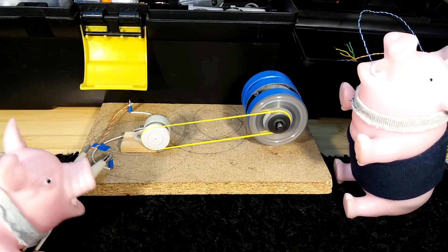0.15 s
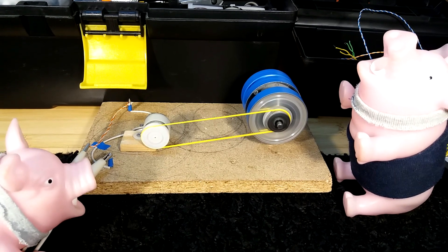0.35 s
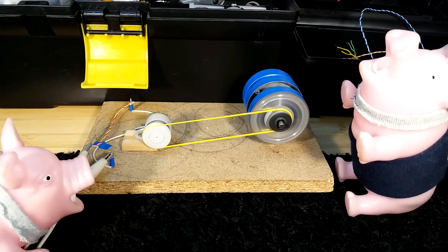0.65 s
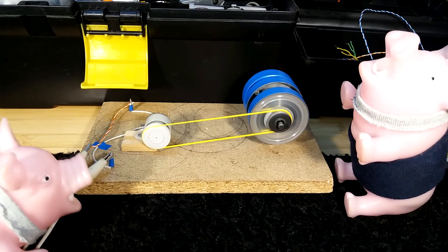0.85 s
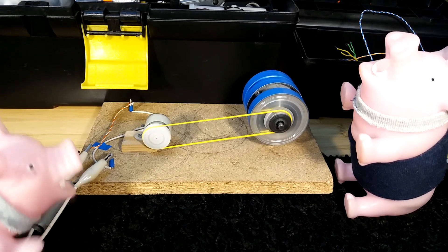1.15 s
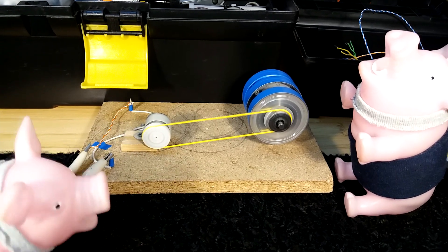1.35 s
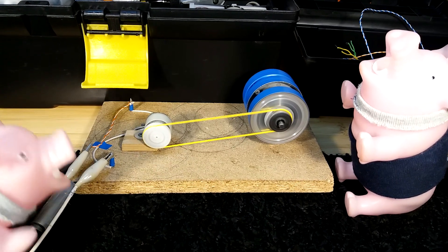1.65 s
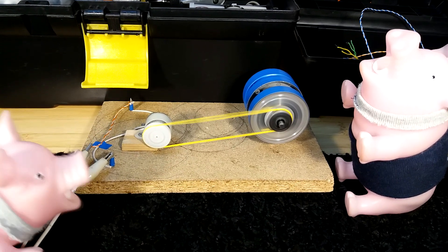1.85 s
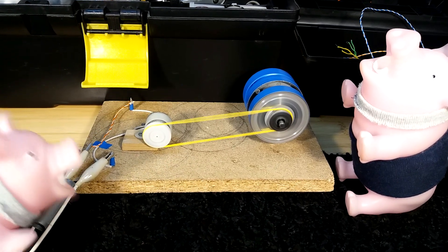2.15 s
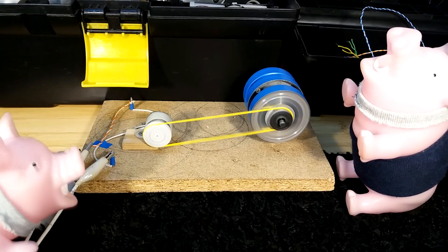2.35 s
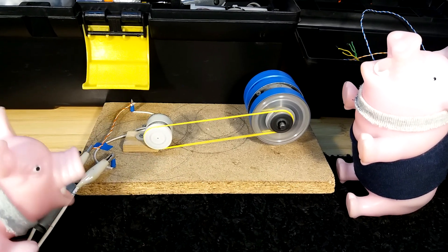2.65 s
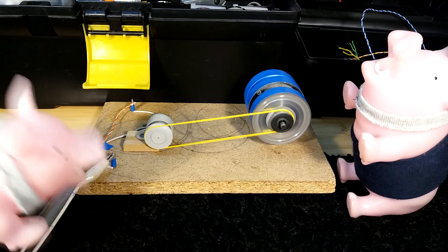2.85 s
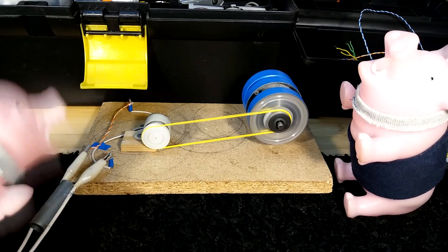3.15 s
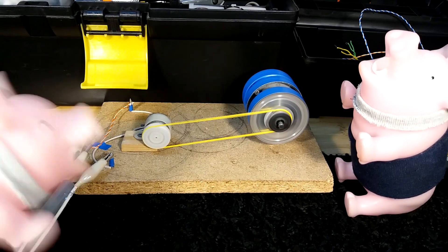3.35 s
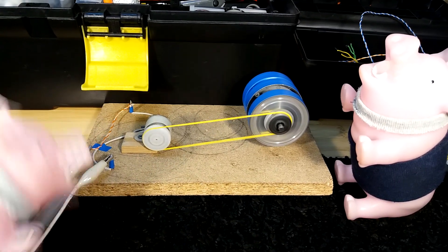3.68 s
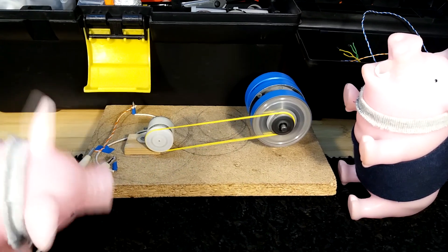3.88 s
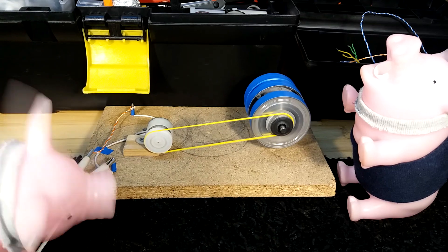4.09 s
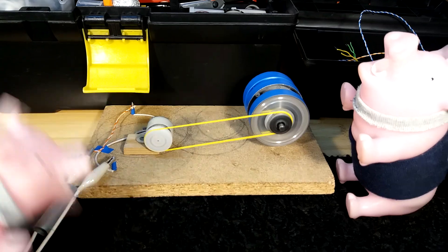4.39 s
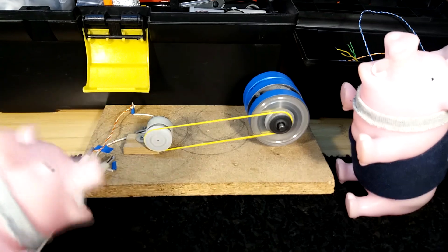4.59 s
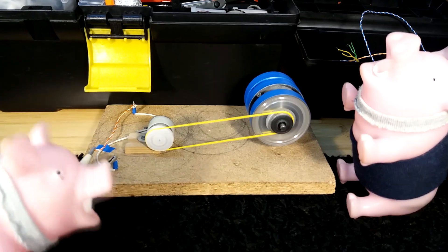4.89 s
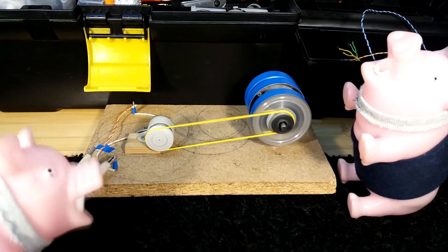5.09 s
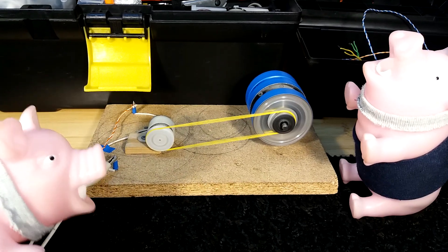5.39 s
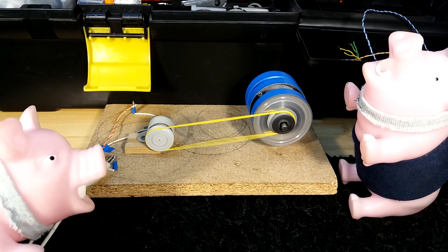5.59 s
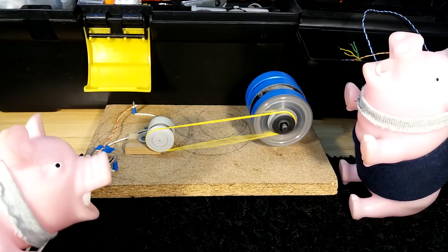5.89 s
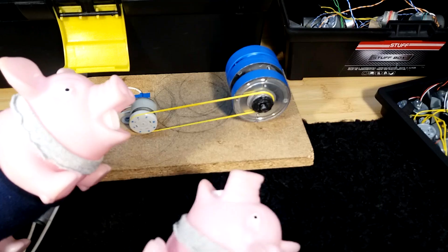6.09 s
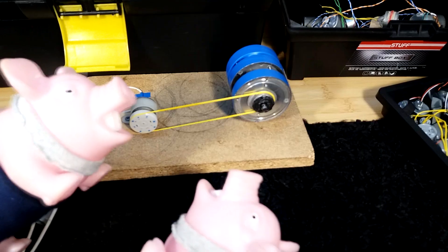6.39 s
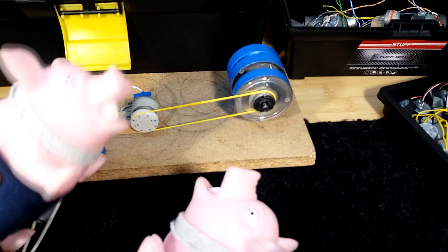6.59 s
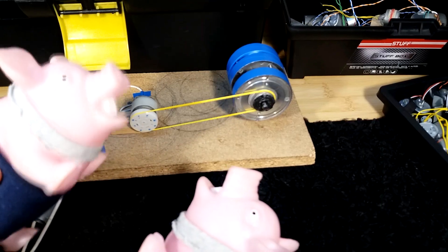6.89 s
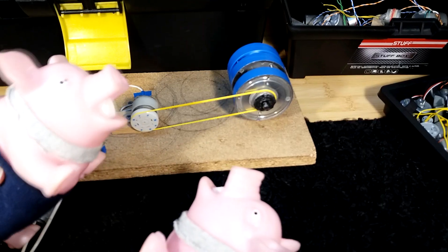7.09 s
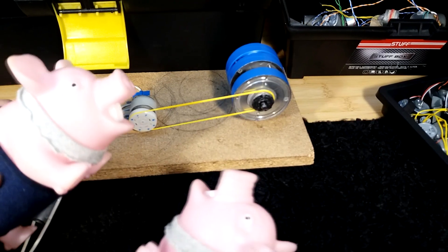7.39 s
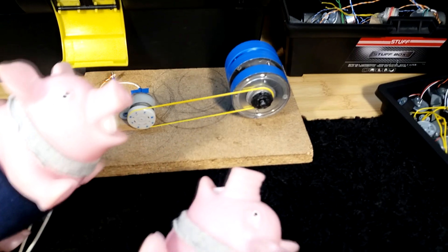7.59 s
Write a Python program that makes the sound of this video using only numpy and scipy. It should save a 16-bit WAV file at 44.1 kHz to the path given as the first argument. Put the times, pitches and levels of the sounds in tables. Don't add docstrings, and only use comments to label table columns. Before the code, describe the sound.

Buzzing, knocking little motor gradually dropping in pitch under short rubbery toy grunts, then abrupt quiet with loud squeals and faint air hisses.

```python
import sys
import numpy as np
from scipy import signal
from scipy.fft import rfft, irfft
from scipy.io import wavfile
from scipy.ndimage import uniform_filter1d

SR = 44100
rng = np.random.default_rng(int(sys.argv[2]) if len(sys.argv) > 2 else 0)


def generate_wav(signal):
    frames = np.transpose(np.atleast_2d(signal))
    scaled = np.clip(frames, -1, 1) * 32767
    pcm = np.round(scaled).astype(np.int16)
    wavfile.write(sys.argv[1], SR, pcm)


def how_loud(loudness_db):
    steps = np.asarray(loudness_db, float) / 20
    return 10 ** steps


N = 341334
MOTOR_END_S = 6.048

# start_s, length_s, strength_db, top_flap_rate_hz,
# grip_db (+ opens the throat, - the snout)
NEAR_GRUNTS = [
    (5.095, .118, -18.5, 237.8, 1),
    (6.222, 0.1, -22, 108.8, 1.4),
    (6.478, 0.15, -18, 240.2, 3),
    (6.817, 0.1, -18.5, 208.7, 2.5),
    (7.054, 0.11, -24, 102.4, 1.9),
    (7.289, .142, -17.5, 225, 1),
    (7.508, 0.13, -18.5, 177.3, 1.8),
    (7.659, .12, -17.5, 231.7, 1.4),
]


def motor(mode_spread_db=3.0, grit_per_s=2500, grit_db=3.5, wobble=0.082, late_s=.0004):
    # time_s, turns_per_s
    shaft_speed = [(0.0, 100.86), (0.6, 98.55), (1.2, 95.21), (1.8, 92.02), (2.4, 88.95), (3.0, 85.83),
                   (3.6, 82.81), (4.2, 80.03), (4.8, 77.12), (5.4, 74.39), (6.0, 71.71)]
    # time_s, knock_db, brush_grind_db
    shaft_load = [
        (0, -33.5, -26.5),
        (1.5, -32, -32),
        (3, -30.5, -33),
        (4.5, -30.5, -36.5),
        (6.05, -32.5, -38),
    ]
    # pitch_hz, width_hz, knock_db, brush_db
    can_modes = [(184, 46.6, -20.5, -25.5), (547, 26, -20, -21.5), (831, 27.4, -22, -38),
                 (1127, 35, -21.5, -8), (1534, 32, -21, -9.5), (1961, 84, -12.5, -11), (3010, 81, -25, -6),
                 (3224, 167, -26, -20), (4336, 75, -19, 2.5), (4818, 44, -17, -4), (4897, 168, -25.5, -21),
                 (5780, 30, -60, -27), (7680, 66, -41, -22.5), (8430, 39, -46, -30), (8720, 51, -48, -25),
                 (10290, 118, -67.5, -21)]
    # pitch_hz, density_db (per Hz)
    whirr_spectrum = [(24, -56), (40, -28), (204, 9), (990, 6), (1120, 10.5), (1720, 9), (1950, 6),
                      (2700, 1), (3830, -1.5), (4340, -24.5), (6330, -48), (7730, -14), (16000, -54)]
    # time_s, peak_db
    hard_knocks = [(0.622, -15), (1.9794, -15), (2.4119, -15), (2.812, -16), (2.9607, -15), (3.0884, -15),
                   (4.4303, -15), (4.4672, -17), (4.7112, -16), (4.7885, -16), (4.9057, -18), (5.0494, -16),
                   (5.3423, -17), (5.3822, -18), (5.4091, -20), (5.437, -16), (5.5847, -17), (5.8586, -17),
                   (5.915, -18), (5.9284, -17)]
    first_turn = .4
    flicker_per_s, knock_flicker_db, grind_flicker_db = 9, 1.6, 1.8
    whirr_db = -39

    turns = first_turn + np.cumsum(in_time(shaft_speed)[0]) / SR
    knock_db, grind_db = in_time(shaft_load)
    knock_db = knock_db + knock_flicker_db * drift(flicker_per_s)
    grind_db = grind_db + grind_flicker_db * drift(flicker_per_s)

    at = np.flatnonzero(np.diff(np.floor(turns)))
    luck = np.clip(rng.standard_normal((len(at), len(can_modes) + 2)), -2.5, 1.5)
    mode_luck, strength_luck, timing_luck = luck[:, :-2], luck[:, -2], luck[:, -1]
    at = np.clip(at + (late_s * SR * timing_luck).astype(int), 0, N - 1)
    hard = np.zeros(N)
    for s, peak_db in hard_knocks:
        hard[round(s * SR)] = how_loud(peak_db + 46)

    sparks = rng.random(N) < grit_per_s / SR
    grit = sparks * how_loud(grit_db * np.minimum(rng.exponential(1, N), 5)) * rng.choice([-1, 1], N)
    grit = grit * (1 + wobble * np.cos(2 * np.pi * (turns - .1)))

    knock, grind = 0, 0
    for k, (hz, width_hz, hit_db, rub_db) in enumerate(can_modes):
        clicks = np.zeros(N)
        clicks[at] = how_loud(2.6 * strength_luck + mode_spread_db * mode_luck[:, k])
        struck = how_loud(hit_db) * (-1) ** k * np.array([clicks, hard])
        knock = knock + resonate(resonate(struck, hz, width_hz), hz, 19.5 * width_hz)
        rubbed = resonate(resonate(grit, hz, 2.9 * width_hz), hz, 1.8 * width_hz)
        grind = grind + how_loud(rub_db) * rubbed
    grind = rms_one(grind)
    # Hz, dB under the grind
    for hz, db in [(5117, -30), (5461, -18.5), (8950, -35), (10720, -37)]:
        grind = grind + how_loud(db) * rms_one(resonate(resonate(grit, hz, 1.6), hz, 40))

    whirr = how_loud(whirr_db + .5 * (grind_db + 31)) * coloured(whirr_spectrum)
    regular_knock = how_loud(knock_db - 1.5) * rms_one(knock[0])
    running = np.arange(N) < MOTOR_END_S * SR
    return running * (regular_knock + knock[1] + how_loud(grind_db + 0.5) * grind + whirr)


def toy(squeezes, body, hand_db, open_db, start_hz, jitter, gain_db, breath_db, brighten, puff_s, scatter_db):
    grip_reach = np.array((0.86, -1.78, -0.00093))
    short_s, short_loss_db = .08, -7
    edge_dulling = 2.4
    snap_db, snap_hz = -17, 1100

    pulses = np.zeros(N)
    effort_db = np.full(N, -40.)
    grip_db = np.zeros((4, N))
    for s, length, strength_db, top_hz, grip in squeezes:
        rows, effort = squeeze(s, length, strength_db, top_hz, start_hz, hand_db)
        s, rate = rows[0]
        first = round((s - 2 / rate) * SR)
        count = round(rows[-1][0] * SR) - first
        rate = in_time(rows, first=first, count=count)[0]
        rate = uniform_filter1d(rate, size=SR // 40, mode="nearest")
        stirring = (first / SR, effort[0][1] - 14)
        db, = in_time([stirring] + list(effort), first=first, count=count)

        flap = np.r_[0, np.flatnonzero(np.diff(np.floor(np.cumsum(rate) / SR)))]
        uneven = jitter * np.clip(grip, 1, 4) * rng.standard_normal(len(flap))
        flap = np.clip(flap + (uneven * SR / rate[flap]).astype(int), 0, count - 1)
        flap = flap[(flap + first >= 0) & (flap + first < N)]
        size_db = db[flap] + .7 * rng.standard_normal(len(flap))
        pulses[first + flap] = how_loud(size_db) * np.sqrt(SR / rate[flap])

        dulled_db = db + edge_dulling * (db - strength_db)
        effort_db[max(first, 0):first + count] = dulled_db[max(-first, 0):][:N - first]
        opening_db = grip * grip_reach + open_db + short_loss_db * (length < short_s)
        grip_db[1:, max(first, 0):] = opening_db[:, None]

    puff = signal.lfilter([1], [1, -np.exp(-1 / (puff_s * SR))], pulses) * rng.standard_normal(N)
    sway = np.repeat(rng.standard_normal((len(body), N // 1536 + 1)), 1536, axis=1)[:, :N]
    belly, snout = 0, 0
    for (hz, width_hz, db), shape in zip(body, sway):
        colour = how_loud(db + brighten * min(hz / 1000, 8) * (effort_db + 2.5))
        colour = colour * how_loud(grip_db[np.searchsorted([700, 2000, 4000], hz)])
        if hz < 700:
            belly = belly + resonate(-pulses * colour, hz, width_hz)
        else:
            breath = how_loud(breath_db) * min(hz / 5000, 1) * puff
            jet = breath - pulses * how_loud(np.clip(scatter_db * shape, -4, 2.5))
            snout = snout + resonate(resonate(jet * colour, hz, width_hz), hz, 1.53 * width_hz)
    snap = how_loud(snap_db) * low(pulses, snap_hz, order=4)
    gap = signal.iirnotch(3850, 4, fs=SR)
    return how_loud(gain_db) * signal.lfilter(*gap, low(belly, 2130) + snout - snap)


def squeeze(s, length, db, top_hz, start_hz, hand_db):
    attack_s, release_s = .022, .036
    arch = .72
    slack = 35.4 + .43 * top_hz
    end = s + length
    top = s + .41 * length
    loose = max(end - release_s, top + 0.0061)
    start = min(start_hz, 1.25 * top_hz)
    rates = [(s, start), ((s + top) / 2, start + arch * (top_hz - start)), (top, top_hz),
             ((top + loose) / 2, slack + arch * (top_hz - slack)), (loose, slack), (end, .85 * slack)]
    pressure = [(s, db + hand_db[0]), (s + attack_s, db),
                (end - release_s, db + hand_db[1]), (end, db + hand_db[2])]
    return rates, pressure


def refill():
    # pitch_hz, density_db (per Hz)
    inlet_spectrum = [(29, -67), (50, -41), (107, 11), (200, 1), (247, 14), (292, -2), (627, -3), (898, 0),
                      (1110, 13.5), (1250, 2), (1380, 9.5), (1930, -7), (4550, -17), (10000, -28.5),
                      (15000, -53)]
    refill_db, fade_db_per_s, left_db = -34.5, 109, -36
    whistle_hz, whistle_db = 4570, -18.5

    rows = [(MOTOR_END_S, left_db)]
    for s, length, *rest in NEAR_GRUNTS[1:]:
        last_s, last_db = rows[-1]
        rows += [(s, last_db - fade_db_per_s * (s - last_s)), (s + length, refill_db)]
    hiss = coloured(inlet_spectrum)
    whistle = resonate(resonate(rng.standard_normal(N), whistle_hz, 150), whistle_hz, 300)
    heard = np.arange(N) >= MOTOR_END_S * SR
    return how_loud(in_time(rows)[0]) * (hiss + how_loud(whistle_db) * rms_one(whistle)) * heard


def room(x, wall_hz=5000, t60_s=.27):
    s = np.arange(SR // 2) / SR
    tail = rng.standard_normal(len(s)) * how_loud(-60 * s / t60_s) * (s > .004)
    return signal.fftconvolve(low(x, wall_hz), tail / np.sqrt(np.sum(tail ** 2)))[:N]


def background(hiss_db=-69, rumble_db=-49, whine_db=-81, whine_hz=15700):
    # time_s, level_db
    rumble_course = [
        (0, 1),
        (5, -0.5),
        (5.4, -5),
        (7.74, 2),
    ]
    hiss, rumble, whine = rng.standard_normal((3, N))
    rumble = how_loud(rumble_db + in_time(rumble_course)[0]) * rms_one(low(rumble, 116))
    whine = how_loud(whine_db) * rms_one(resonate(whine, whine_hz, 10))
    return how_loud(hiss_db) * hiss + rumble + whine


def rms_one(x):
    return x / np.sqrt(np.mean(x ** 2) + 1e-20)


def in_time(rows, first=0, count=N):
    s, *columns = np.transpose(rows)
    return [np.interp((first + np.arange(count)) / SR, s, c) for c in columns]


def resonate(x, hz, width_hz):
    r = np.exp(-np.pi * abs(width_hz) / SR)
    zeros = np.array([1, 0, -1]) * (1 - r * r) / 2
    poles = [1, -2 * r * np.cos(2 * np.pi * hz / SR), r * r]
    return signal.lfilter(zeros, poles, x + 1e-18)


def low(x, cut_hz, order=2):
    return signal.sosfilt(signal.butter(order, cut_hz, fs=SR, output="sos"), x)


def coloured(spectrum):
    hz, db = np.transpose(spectrum)
    at = np.log(np.linspace(0, SR / 2, N // 2 + 1) + 1)
    gain = how_loud(np.interp(at, np.log(hz), db))
    return rms_one(irfft(rfft(rng.standard_normal(N)) * gain, N))


def drift(per_s):
    knots = rng.standard_normal(int(N / SR * 2 * per_s) + 2)
    return rms_one(np.interp(np.arange(N) / SR * 2 * per_s, np.arange(len(knots)), knots))


def scene():
    # start_s, length_s, strength_db, top_flap_rate_hz, grip_db
    far_grunts = [(-0.03, 0.12, -33, 63.4, -1), (0.2, 0.059, -28.5, 67, 12), (0.365, 0.07, -37.5, 77.2, 0),
                  (0.68, 0.048, -25, 85, 4), (0.842, 0.08, -31, 84.3, .6), (1.165, 0.12, -26.5, 74.9, -0.3),
                  (1.453, 0.12, -27.5, 71.8, 2.1), (1.747, 0.1, -25.5, 72.6, 1),
                  (2.012, 0.11, -27.5, 71.3, -0.7), (2.289, 0.11, -25, 85.4, 0.3),
                  (2.528, 0.093, -31, 63.9, 0), (2.962, .124, -25, 70.6, -0.5),
                  (3.377, 0.12, -26.5, 80.5, 8), (3.653, 0.11, -32.5, 63.6, 9),
                  (3.938, 0.12, -21.5, 110.5, 1.3), (4.193, 0.085, -22.5, 99, 4),
                  (4.404, 0.073, -39, 68.9, -5), (4.533, 0.072, -34.5, 75.3, 4),
                  (4.714, 0.087, -35.5, 66.7, 12)]
    # pitch_hz, width_hz, level_db
    far_body = [(162.6, 29, 4.5), (197.6, 136, 6), (492, 120, -4), (870, 45, -52), (1127, 31, -6),
                (1600, 650, -7.5), (2240, 100, -2.5), (2904, 275, 0), (4490, 28, -43), (4340, 130, -25),
                (5270, 220, -10.5), (5880, 230, -10.5), (6700, 300, -56), (7920, 670, -17.5),
                (8170, 180, -20), (12000, 15000, -41)]
    # pitch_hz, width_hz, level_db
    near_body = [(188.4, 6.3, 3), (187, 117, 5), (277, 22, -33.5), (474, 270, -18), (782, 102, 0),
                 (904, 203, 1.5), (1028, 600, -7), (1637, 115, -3), (2494, 62, 0.5), (2964, 212, 2.5),
                 (3084, 105, -5.5), (4640, 310, -3), (5090, 210, -7), (5990, 500, -8.5), (6470, 160, -14),
                 (7730, 300, -19), (7800, 480, -23), (12500, 7400, -40)]
    toys = toy(far_grunts, far_body, hand_db=(-13, -0.5, -25), open_db=(4, 2, 0),
               start_hz=88.4, jitter=.035, gain_db=15, breath_db=-9.5,
               brighten=0.11, puff_s=0.0056, scatter_db=2)
    toys = toys + toy(NEAR_GRUNTS, near_body, hand_db=(-6.5, -1, -15.5), open_db=(2, 1, -0.64),
                      start_hz=116.3, jitter=.007, gain_db=18.5, breath_db=-20.0,
                      brighten=0.038, puff_s=0.0036, scatter_db=14.0)
    room_db = -12.5
    return (motor() + toys + how_loud(room_db) * room(toys) + refill() + background())[None]


def low_pass(x):
    return signal.sosfilt(signal.butter(12, 17070, fs=SR, output="sos"), x)


def record(dry):
    x = signal.sosfilt(signal.butter(3, 70, "high", fs=SR, output="sos"), dry)
    x = x / (1 + np.abs(x / .97) ** 4) ** (1 / 4)
    x = signal.sosfilt(signal.ellip(10, .5, 70, 15900, fs=SR, output="sos"), x)
    return low_pass(x)


dry = scene()
out = record(dry)
generate_wav(out)
```